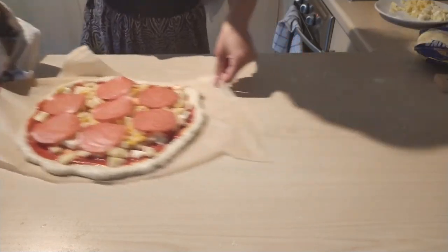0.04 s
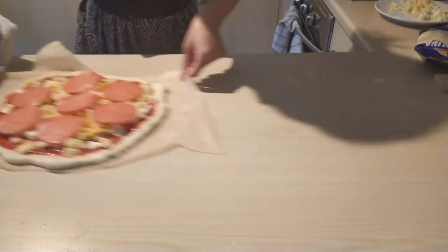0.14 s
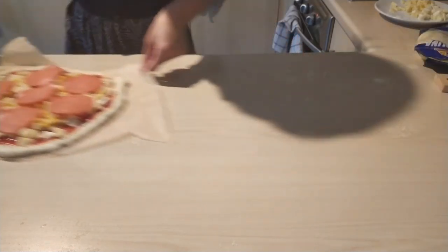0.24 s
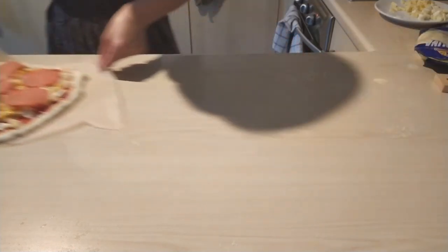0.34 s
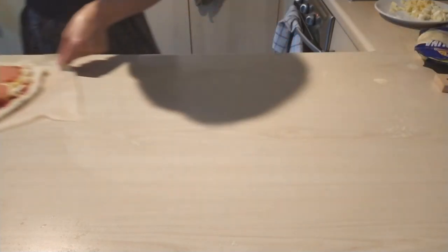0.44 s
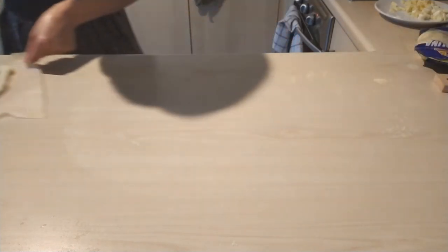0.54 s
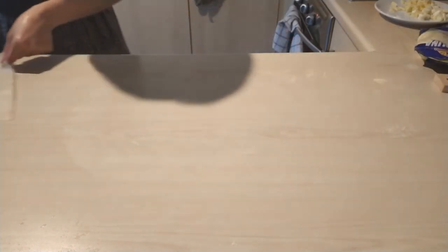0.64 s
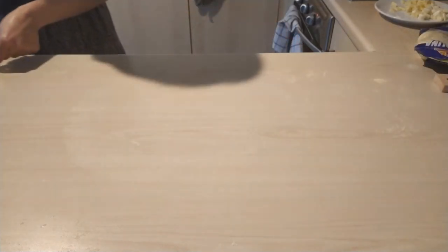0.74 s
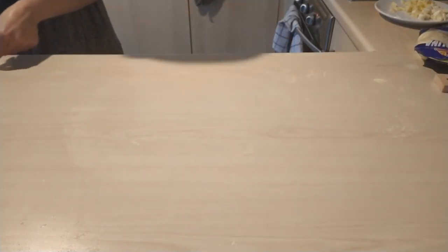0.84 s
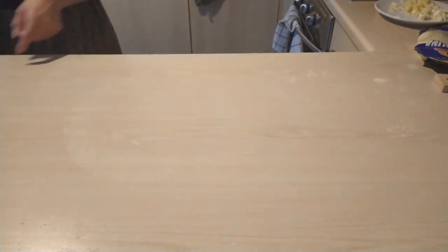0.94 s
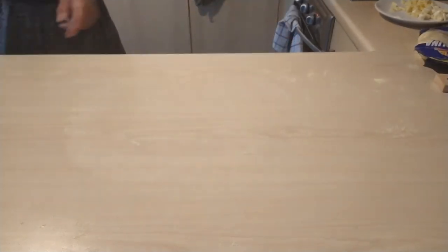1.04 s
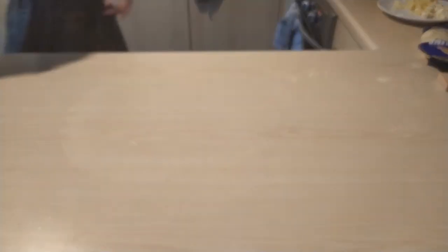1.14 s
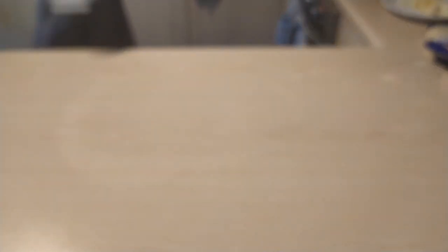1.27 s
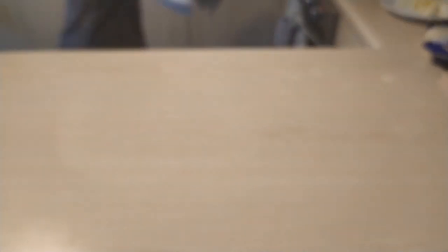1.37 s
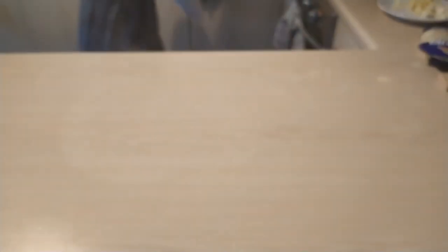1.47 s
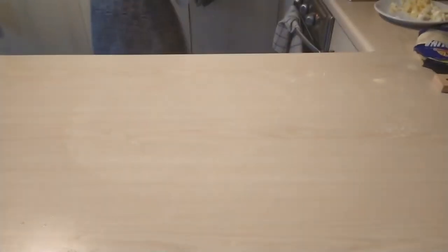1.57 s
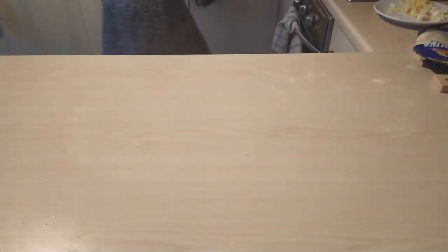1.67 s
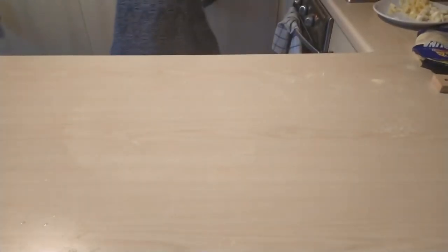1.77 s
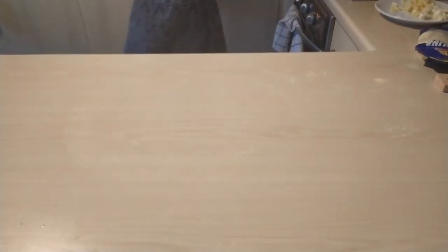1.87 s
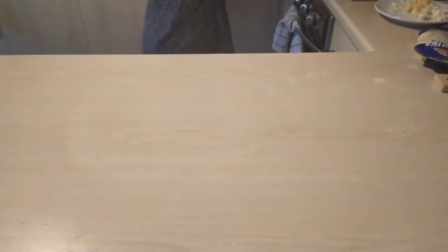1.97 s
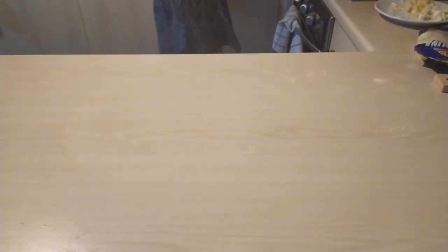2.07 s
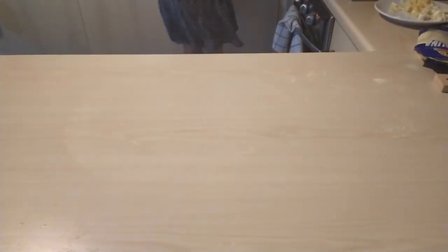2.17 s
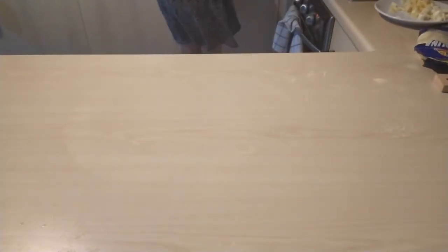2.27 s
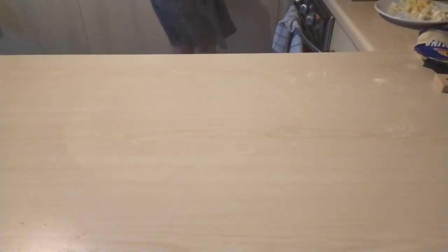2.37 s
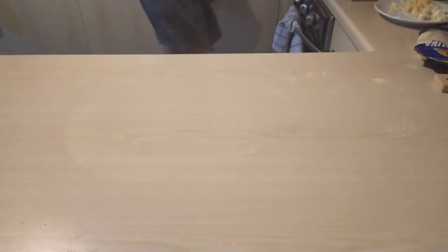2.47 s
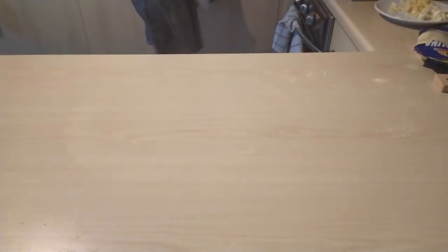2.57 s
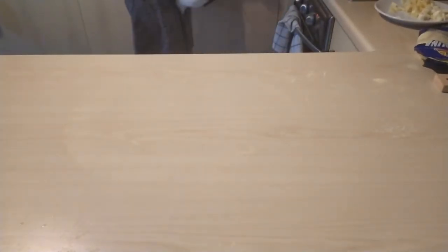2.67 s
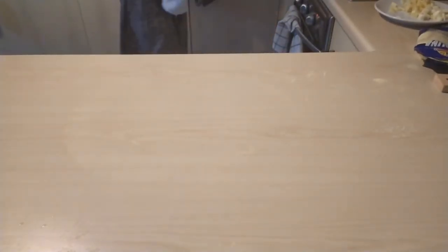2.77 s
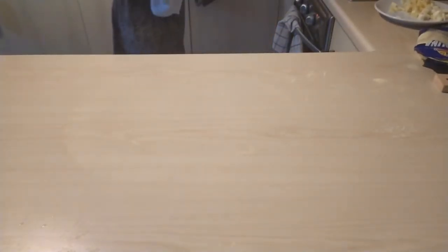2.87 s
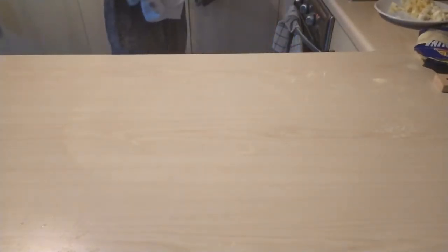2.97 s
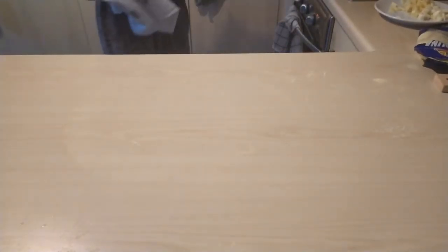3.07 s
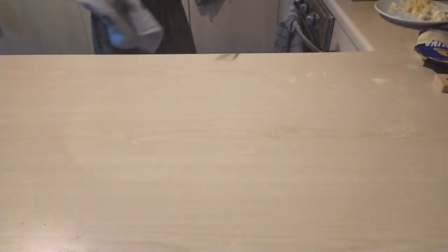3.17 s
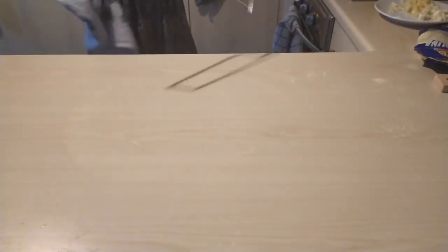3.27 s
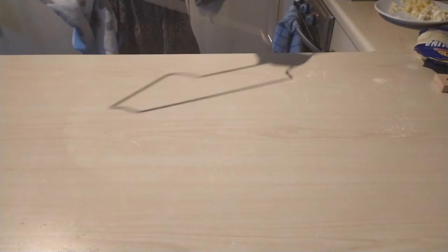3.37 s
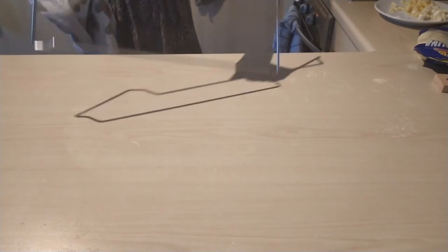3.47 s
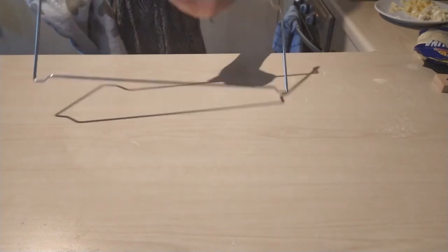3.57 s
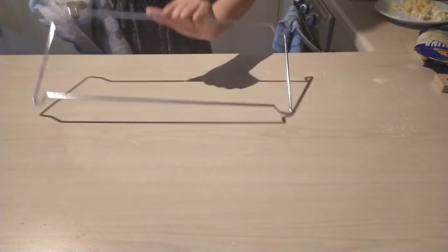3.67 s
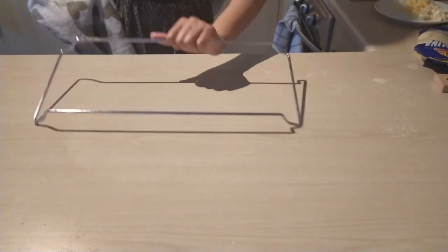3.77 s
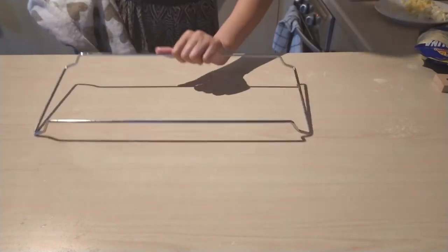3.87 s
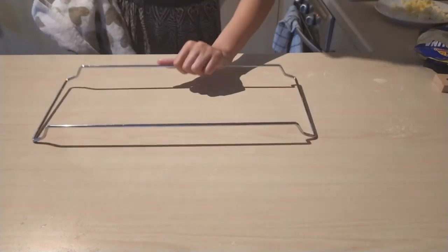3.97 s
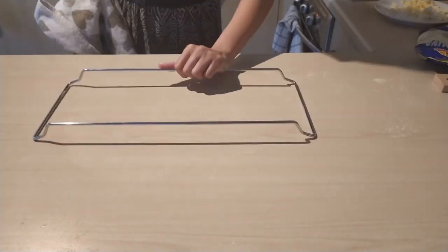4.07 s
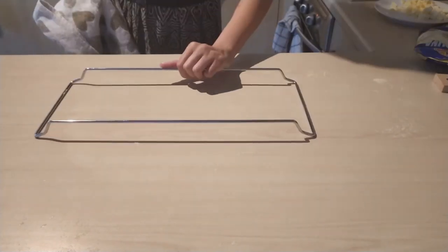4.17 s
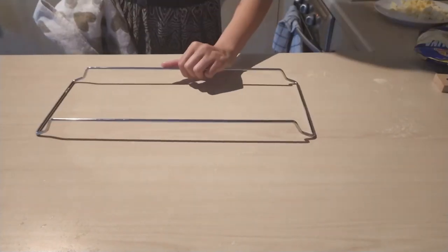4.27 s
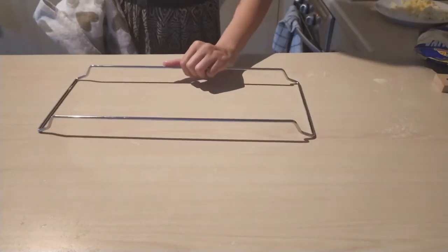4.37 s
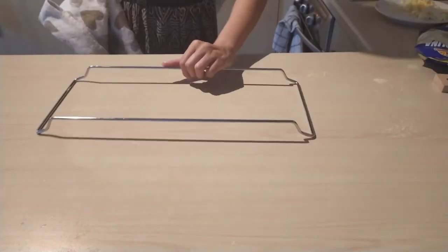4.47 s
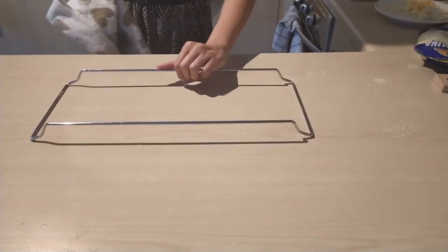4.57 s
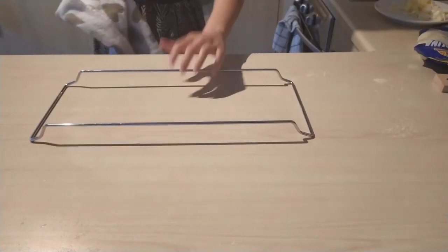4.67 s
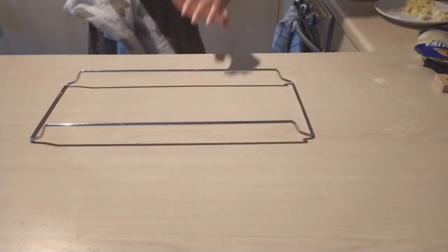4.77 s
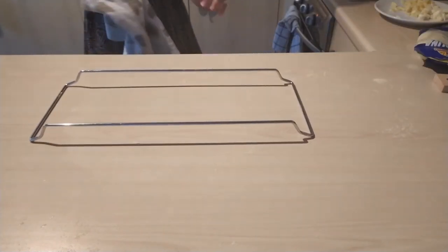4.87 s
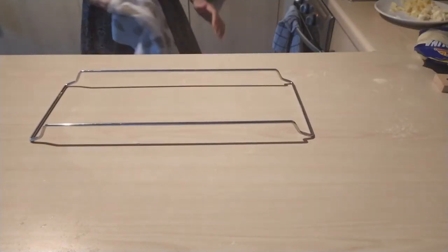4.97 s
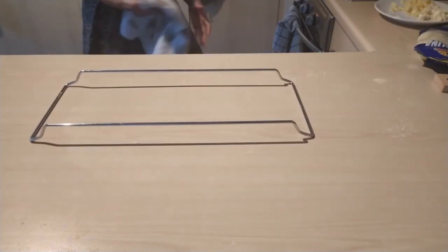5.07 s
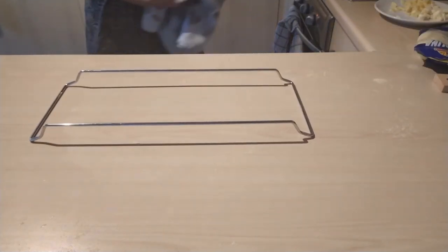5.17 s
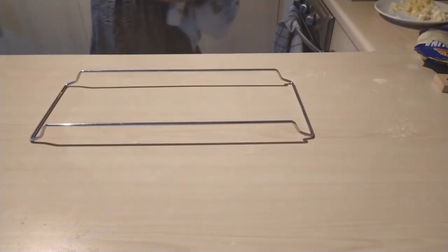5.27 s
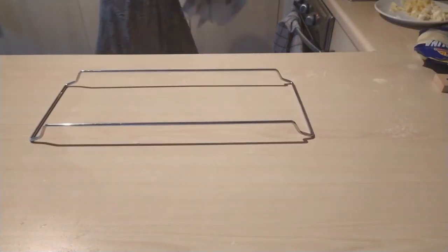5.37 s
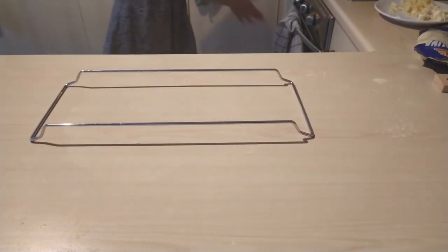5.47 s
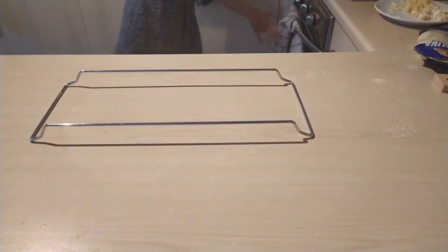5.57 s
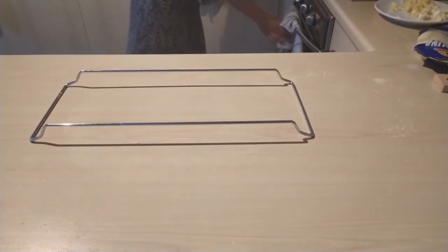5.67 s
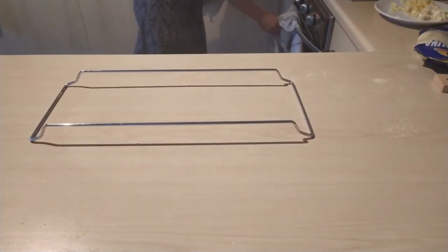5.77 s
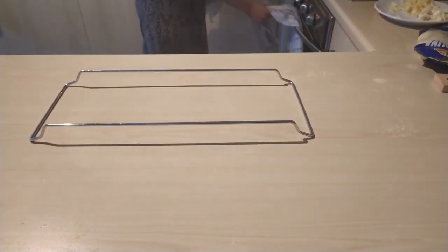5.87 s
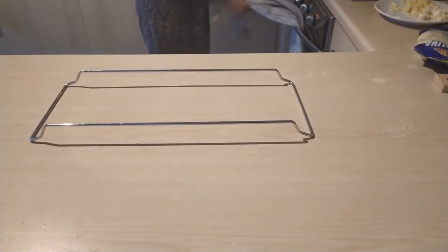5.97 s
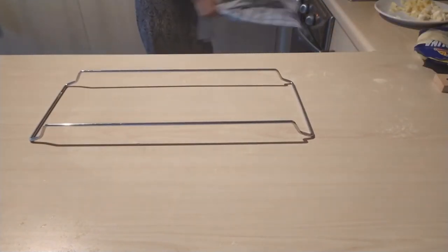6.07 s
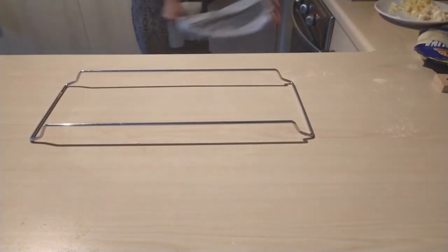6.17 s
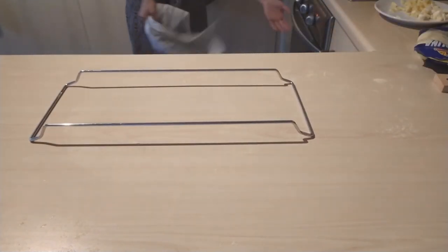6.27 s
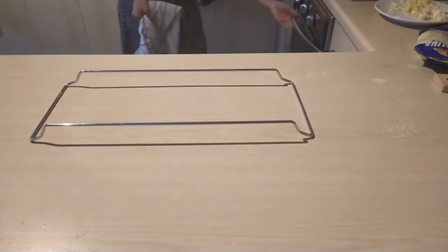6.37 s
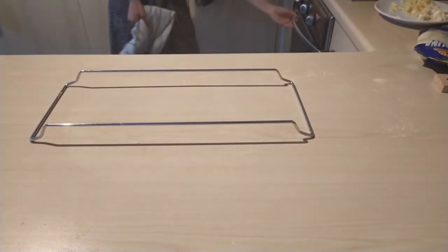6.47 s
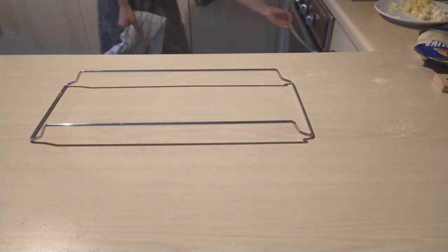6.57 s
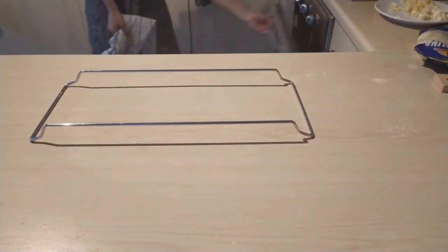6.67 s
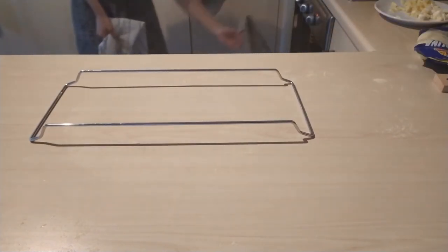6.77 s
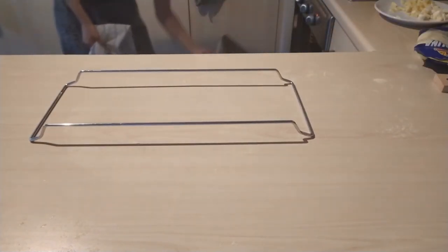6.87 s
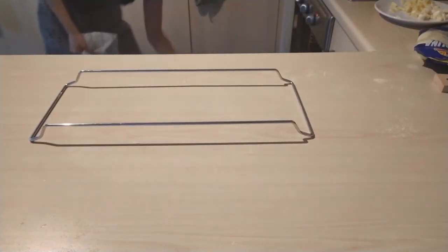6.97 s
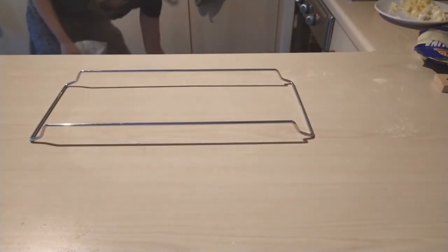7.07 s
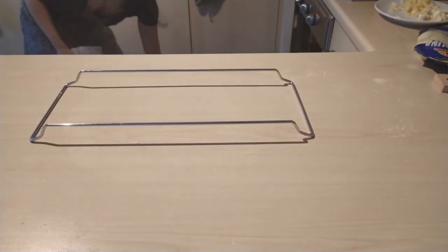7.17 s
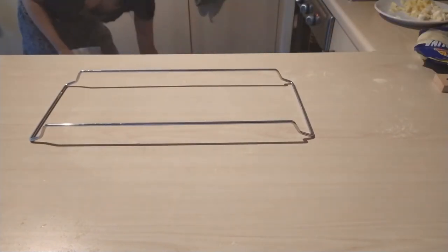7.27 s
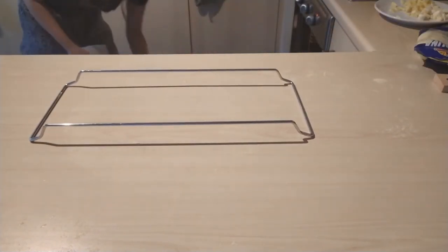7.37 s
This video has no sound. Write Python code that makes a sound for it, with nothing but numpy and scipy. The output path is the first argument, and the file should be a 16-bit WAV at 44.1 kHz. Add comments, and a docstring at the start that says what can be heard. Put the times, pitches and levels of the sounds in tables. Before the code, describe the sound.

Baking paper slides off a kitchen counter with a crackle, then a wire oven rack scrapes and clanks down, and an oven door opens.

```python
"""Baking paper hisses and crackles as it slides off a kitchen counter, close to two microphone ports.
A wire rack is dragged in dense little slips, clanks down so that wires and counter top ring together,
and is nudged into place. Cloth rustles, soles scuff, dull knocks come from farther off, and an oven door
opens on its fan. A short kitchen echo and a bed of air, hum and rumble lie behind it all."""
import sys
import numpy as np
from scipy import signal
from scipy.fft import rfft, irfft
from scipy.io import wavfile
from scipy.ndimage import uniform_filter1d

SR = 44100
rng = np.random.default_rng(int(sys.argv[2]) if len(sys.argv) > 2 else 0)


def to_wav(sig):
    """Store sig (one row per channel, or 1-D mono) as 16-bit WAV at the path in sys.argv[1].

    Samples outside -1..1 are clipped; the rate is SR.
    """
    pcm = np.clip(np.atleast_2d(sig), -1, 1) * 32767
    pcm = np.round(pcm).astype(np.int16)
    wavfile.write(sys.argv[1], SR, pcm.T)  # frames by channels


N = 327663

# rack meets counter: (time [s], level [dB], flatness [0 corner, 1 whole bar], treble [dB],
# ring length [factor], lasting ring [dB])
BLOWS = [(3.489, -8, 0.23, -5, 0.5, -9.5), (3.540, -12.5, 0.21, 4.5, 0.46, -6.5),
         (3.5453, -19, 0.16, 0, 0.38, -22), (3.564, -31.5, 0.34, 21, 0.26, -25),
         (3.571, -24, 0.11, 7.5, 0.68, -6.5), (3.634, -27.5, 0.5, 0, 0.51, -30),
         (3.713, -14, 0.81, 6, 0.91, -28), (3.7292, -19, 0.73, 3.5, 0.81, -18.5),
         (3.8013, -22.5, 0.89, 1, 0.57, -34), (3.807, -26, 0.85, 0.5, 0.95, -16),
         (3.84, -28.5, 0.74, -3, 0.6, -12), (4.0913, -28, 1, 13, 0.33, -30),
         (4.096, -28, 0.49, 6, 0.51, -26), (4.107, -32, 0.66, -3, .8, -16)]
# rack and counter top ringing together: (frequency [Hz], level [dB], t60 before damping [s])
RACK_MODES = [(200.5, -6, 0.18), (265, -3.5, 0.22), (296, -2, 0.16), (438, -6, 0.19), (451.5, 1.5, 0.26),
              (624, -14, 0.22), (797, 2.5, 0.088), (860, 0, 0.15), (1020, -3.5, 0.29), (1098, 0, 0.2),
              (1155, -1.5, 0.15), (1180, 0, 0.16), (1398, -6.5, 0.19), (1410, 2, 0.031), (1458, -3.5, 0.21),
              (1520, -11, 0.097), (1595, -7.5, 0.17), (1685, -9.5, 0.13), (1770, -11.5, .12),
              (1945, -1.5, 0.12), (2234, -0.5, 0.07), (2200, -3, 0.22), (2510, -4, 0.13), (2800, 0, 0.11),
              (3460, -8.5, 0.052), (3850, -10, 0.039), (4230, -16.5, 0.064), (5540, -29, 0.25)]
# how a landing stirs each band: (frequency [Hz], on a corner [dB], on a whole bar [dB])
LANDING_TONE = [(280, -2, -3), (550, -14.5, 3.5), (810, 5, -15), (1026, 5.5, -14.5), (1380, 4.5, 5.5),
                (1950, -14, 5.5), (2420, 3.5, -3), (2750, -3, -3), (3440, -5, 1.5), (4600, -5, 8.5),
                (5550, 1.5, 7.5)]
# first clash of wire on counter: (frequency [Hz], level [dB])
CRACK_TONE = [(88, -46.5), (150, -18.5), (634, -5.5), (1230, 4), (2580, -4), (4450, -19.5), (5100, -26.5),
              (8310, -20.5), (10700, -24), (12500, -47), (15800, -52.5)]
# the drag and the nudge, a curve each: (time [s], level [dB], contact resonance [Hz])
DRAGS = [
    [(2.075, -52, 1280), (2.095, -56.5, 1300), (2.17, -49.5, 1330), (2.215, -52, 1380), (2.245, -44, 1200),
     (2.33, -41.5, 1160), (2.398, -45.5, 1090), (2.48, -44, 1010), (2.51, -50, 1050), (2.57, -80, 1104)],
    [(4.24, -74, 1600), (4.34, -57, 1710), (4.38, -66, 1600), (4.494, -62.5, 1010), (4.544, -51, 1520),
     (4.598, -55, 1380), (4.72, -72.5, 1100)],
]
# wire on a rough surface: (frequency [Hz], level [dB])
SCRAPE_TONE = [(200, -37), (437, 3.5), (570, -6), (900, -4), (1300, 0), (1950, -6.5), (2350, -5),
               (4300, -19.5), (7000, -40.5)]
# the paper's slide: (time [s], level [dB])
PAPER_SLIDE = [(0, -39), (.15, -42.5), (.25, -38), (.32, -41.5), (.46, -43), (.6, -50), (.76, -49),
               (.92, -48.5), (.97, -64), (1.1, -99)]
# paper rubbing on the counter: (frequency [Hz], level [dB])
PAPER_TONE = [(350, -54), (700, -13), (1400, -8), (3910, -6), (5360, -9), (9520, 5.5), (11000, 0.5),
              (11900, -11.5), (15800, -17)]
# paper hiss across the ports: (frequency [Hz], left-right likeness [0 to 1])
PAPER_LIKENESS = [(600, .6), (1500, .1), (4000, .1), (15000, 0)]
# side the paper hiss favours: (frequency [Hz], left over right [dB])
PAPER_BALANCE = [(60, 4.5), (240, 4.0), (950, 3.5), (3770, -2), (15000, -3)]
# the paper snaps as it creases: (time [s], level [dB], t60 [s])
SNAPS = [(.108, -34, 0.017), (0.224, -44, .02), (0.2446, -29, 0.0092), (0.254, -23, 0.011),
         (0.325, -33, 0.025), (0.3787, -38, 0.017), (0.38, -26.5, .008), (.4015, -30.5, .007),
         (0.448, -34, 0.017), (0.696, -40, .006), (.7165, -40, .006), (.727, -37, 0.0065),
         (0.732, -44, .04), (0.7397, -35, 0.0065), (0.7662, -39, 0.0096), (0.7703, -31, .025),
         (.787, -30, 0.0072), (0.8213, -30.5, 0.0094), (0.825, -38, 0.097)]
# soles scuff: (time [s], level [dB], t60 [s])
SCUFFS = [(1.771, -57.5, 0.37), (1.993, -49, 0.19), (2.893, -59.5, 1), (5.389, -54.5, 0.24),
          (5.648, -63.5, 1), (6.71, -43.5, 0.38)]
# cloth swishes: (time [s], level [dB], t60 [s])
SWISHES = [(0.61, -49, 0.18), (.69, -52, 0.71), (1.172, -63.5, 0.39), (1.301, -59, 0.3),
           (1.879, -61.5, 0.56), (3.111, -50, 0.26), (4.85, -60.5, 0.43), (5.978, -63, 0.55),
           (7.08, -51, 1.67), (7.17, -55, 0.51), (7.271, -49.5, 0.21)]
# friction hiss of cloth, soles and rack: (frequency [Hz], level [dB])
HISS_TONE = [(880, -36.5), (1500, -19), (1700, -13), (2120, 2), (5510, -1.5), (9370, 3), (10500, 2),
             (14500, -26), (15800, -27)]
# hands, feet and doors: (time [s], level [dB], rise [s], t60 [s])
KNOCKS = [(1.916, -48.5, 0.00087, 0.063), (1.932, -45, 0.0022, 0.18), (5.966, -51, 0.00092, 0.43),
          (6.742, -31.5, 0.01, 0.18), (6.785, -41, 0.0047, 0.24)]
# a dull knock: (frequency [Hz], level [dB])
KNOCK_TONE = [(59, -28), (110, -11), (175, 4), (300, -6), (497, -1.5), (657, -9), (800, 1), (957, -3),
              (1060, -5.5), (5000, -30.5), (11000, -68)]
# the fan comes through as the oven door opens: (time [s], level [dB])
FAN_LEVEL = [(6.45, -65), (6.57, -52.5), (6.858, -46), (7.216, -48), (7.43, -47)]
# rush of the fan: (frequency [Hz], level [dB])
FAN_TONE = [(59, -47), (100, -32.5), (219, -9), (254, -1.5), (325, -21.5), (489, -5), (854, -4.5),
            (1070, -7), (2280, -15.5), (5000, -31), (11000, -40.5)]
# the kitchen's steady air: (frequency [Hz], level [dB])
AIR_TONE = [(41, -27), (70, -33.5), (92, -4), (166, -9), (244, -3.5), (392, -13), (492, -8), (539, -16),
            (676, -8.5), (850, -12.5), (1100, -18.5), (2100, -19.5), (5700, -37.5), (9590, -28),
            (15800, -68)]
# partials of the hum: (frequency [Hz], level [dB])
HUM = [(100.3, -66.5), (197, -71.5), (296, -69)]
# one overtone of the hum comes and goes: (time [s], level [dB])
OVERTONE_LEVEL = [(0, -74), (1.05, -87), (1.25, -69), (1.7, -65), (2.1, -77), (3.95, -65), (4.3, -64.5),
                  (4.85, -70), (5.4, -83.5), (7.43, -74.5)]
# the house rumble swells or sags: (middle [s], half length [s], rumble [dB], drone [dB])
SWELLS = [(2.343, 0.61, 9.5, 5), (3.027, 0.26, 9.5, 18.5), (4.007, 0.73, 7, 0), (5.303, 0.23, 5.5, -1),
          (5.956, 0.59, -3.5, -8.5)]
# decay of the kitchen's echo: (frequency [Hz], t60 [s])
ECHO_T60 = [(200, 0.44), (1000, 0.42), (4000, 0.23), (10000, 0.32)]
# the room across the ports: (frequency [Hz], left-right likeness [1 = identical])
PORT_LIKENESS = [(60, 0.9), (180, 0.87), (550, 0.37), (1650, 0.022), (4970, 0.079), (15000, -0.12)]
# level between the ports: (frequency [Hz], left over right [dB])
PORT_BALANCE = [(60, 6), (180, 4), (550, 4), (1650, 1), (4970, -4), (15000, -2.5)]
# phase between the ports: (frequency [Hz], left lead [rad])
PORT_LEAD = [(300, 0), (800, -.8), (1600, -3), (2400, 0)]

BAR_HZ, OVERTONE_HZ, DRONE_HZ = 1680, 495, 53
AIR_DB, RUMBLE_DB, DRONE_DB = -56, -57.5, -68
DROPOUT_S, BAND_LIMIT_HZ = (2.076, 2.077), 15850


def rack_blows():
    """Close up, each blow is a crack, a short knock of all modes, loose wires chattering and a ring."""
    out, t = np.zeros((2, N)), np.arange(SR // 4) / SR
    for s, db, flatness, treble_db, length, ring_db in BLOWS:
        shelf = [(1600, 0), (3200, treble_db)]
        shade = tilted([(hz, corner + flatness * (bar - corner)) for hz, corner, bar in LANDING_TONE],
                       shelf)
        crack = gain_of(-4.5) * burst(tilted(CRACK_TONE, shade), t60=0.039, rise=0.00045)
        knock = crack + rack_ring(shade, damping=3.54 / length)
        rattle = ticks(len(t), per_s=310, spread=1.5) * gain_of(-22 - 60 * t / 0.5)
        chatter = signal.fftconvolve(knock, rattle[None], axes=1)[:, :knock.shape[1]]
        ring = gain_of(ring_db) * rack_ring(shade, damping=1.46 / length)
        add(out, s, gain_of(db) * (knock + chatter + ring))
    return out


def rack_ring(shade, damping):
    """The modes struck once, neighbours starting opposite ways; high ones differ between the ports."""
    hz, db, t60 = np.transpose(RACK_MODES)[:, :, None]
    t = np.arange(SR // 2) / SR
    scatter, apart, grip = rng.uniform(-0.86, 1, (3, *hz.shape))
    hz = hz * (1 + 0.0073 * grip)  # the hand's grip detunes the wires a little
    phase = 2 * np.pi * hz * t + np.pi * np.arange(len(hz))[:, None] + 0.9 * scatter
    port_phase = 2.6 * apart * np.clip(hz / 1100, 0, 1) ** 2
    decay = gain_of(db + read(shade, hz) - 60 * t * damping / t60)
    swell = np.minimum(t * hz / 2.24, 1)  # a mode needs about two cycles to build up
    ports = [gain_of(side * read(PORT_BALANCE, hz) / 2) * np.sin(phase + side * port_phase / 2)
             for side in (1, -1)]
    return (decay * swell * np.array(ports)).sum(1) / 2


def rack_drags():
    """Dense slips of wire on a rough surface; wires near the contact and a cross bar ring along."""
    shared, *own = [ticks(N, per_s=5700, spread=0.6) for _ in range(3)]
    scrape = coloured(shared + 2.1 * np.array(own), SCRAPE_TONE)
    s, _, hz = np.vstack(DRAGS).T
    contact = unit_rms(resonate(scrape, np.interp(np.arange(N) / SR, s, hz), width_hz=120))
    bar = unit_rms(resonate(scrape, np.full(N, BAR_HZ), width_hz=90))
    hiss = port_noise(HISS_TONE, patchy_db=1, size=256)
    layers = gain_of(-1.5) * scrape + gain_of(-7) * contact + gain_of(-14.5) * bar + gain_of(-11) * hiss
    return layers * sum(level(curve) for curve in DRAGS)


def baking_paper():
    """Close and dry: a sliding hiss with small random crinkles, and the thin snaps of the creases."""
    clicks = ticks(N, per_s=750, spread=3.5)
    crinkle = burst(tilted(PAPER_TONE, [(3000, 2.2), (9000, -2.2)]), t60=0.0035, rise=0.0001)
    crinkles = signal.oaconvolve(clicks[None], crinkle[:, :900], axes=1)[:, :N]
    hiss = port_noise(PAPER_TONE, patchy_db=2, size=256, likeness=PAPER_LIKENESS, balance=PAPER_BALANCE)
    out = level(PAPER_SLIDE) * (hiss + gain_of(-12.5) * unit_rms(crinkles))
    thin = tilted(PAPER_TONE, [(2000, -7), (7000, -5), (13000, 2.5)])
    to_right = gain_of([[-2.1], [2.1]])
    for s, db, t60 in SNAPS:
        add(out, s, gain_of(db) * burst(thin, t60, rise=0.00071) * to_right)
    return out


def soles_and_cloth():
    """Puffs of friction hiss: soles start at once, cloth swells first."""
    out = np.zeros((2, N))
    for s, db, t60 in SCUFFS:
        add(out, s, gain_of(db) * burst(HISS_TONE, t60, rise=0.0046))
    for s, db, t60 in SWISHES:
        add(out, s, gain_of(db) * burst(HISS_TONE, t60, rise=0.1 * t60))
    return out


def distant_knocks():
    """Hands, feet and doors away from the microphone, each a dull mono burst."""
    out = np.zeros(N)
    for s, db, rise, t60 in KNOCKS:
        add(out, s, gain_of(db) * burst(KNOCK_TONE, t60, rise)[0])
    return out


def oven_fan():
    """A low rush of air that comes up as the oven door opens."""
    return level(FAN_LEVEL) * port_noise(FAN_TONE, patchy_db=0.5)


def room_tone():
    """Steady air, a wavering hum to the left, and the deep rumble and drone of the house."""
    t = np.arange(N) / SR
    wavers_db = unit_rms(uniform_filter1d(rng.standard_normal((len(HUM), N)), size=5000, axis=1))
    hum = sum(np.sqrt(2) * gain_of(db + waver) * np.sin(2 * np.pi * (hz * t + rng.random()))
              for (hz, db), waver in zip(HUM, wavers_db))
    drift = unit_rms(uniform_filter1d(rng.standard_normal(N), size=6000))
    hum += level(OVERTONE_LEVEL) * gain_of(3.3 * drift) * sine(OVERTONE_HZ + 4 * drift[::-1])
    rumble = port_noise([(4, -2.5), (10, 6), (35, -6), (45, -15), (150, -61.5)], patchy_db=2.5, size=8192)
    drone = gain_of(2.5 * drift[::-1] + [[2.2], [-2.2]]) * sine(DRONE_HZ + 2.47 * drift)
    air = gain_of(AIR_DB) * port_noise(AIR_TONE, patchy_db=2.5)
    swell_db = sum(np.outer(db, np.maximum(1 - abs(t - s) / half, 0)) for s, half, *db in SWELLS)
    house = gain_of(RUMBLE_DB + swell_db[0]) * rumble + gain_of(DRONE_DB + swell_db[1]) * drone
    return air + house + hum * gain_of([[2.1], [-2.1]])


def kitchen_echo(x):
    """Sparse reflections of random sign, each band dying at its own speed; the ports share the bass."""
    taps = np.zeros((2, SR))
    at = np.arange(130, SR - 20, 20) + rng.integers(0, 20, (2, (SR - 131) // 20))
    np.put_along_axis(taps, at, rng.choice([-1., 1.], at.shape), 1)
    hz, t, (left, other) = signal.stft(taps, SR, nperseg=256)
    alike = np.clip(read(PORT_LIKENESS, hz), 0, 1)[:, None]
    side = gain_of(read(PORT_BALANCE, hz) / 2)[:, None]
    right = alike * left + np.sqrt(1 - alike ** 2) * other
    decay = gain_of(-60 * t / read(ECHO_T60, hz)[:, None])
    tail = signal.istft(np.array([left * side, right / side]) * decay, SR, nperseg=256)[1]
    return signal.fftconvolve(x[None], tail / np.linalg.norm(tail) * np.sqrt(2), axes=1)[:, :N]


def port_noise(tone, patchy_db, size=1024, likeness=PORT_LIKENESS, balance=PORT_BALANCE):
    """Noise at the two ports, from random short-time spectra with drifting patches."""
    frames, hz = 4 * N // size + 5, np.fft.rfftfreq(size, 1 / SR)
    a, b, c, d, patches = rng.standard_normal((frames, len(hz), 5)).T
    left, other = a + 1j * b, c + 1j * d
    patches = unit_rms(uniform_filter1d(uniform_filter1d(patches, size=9, axis=0), size=9, axis=1))
    alike = np.clip(read(likeness, hz), 0, 1)[:, None]
    right = alike * left * np.exp(-1j * read(PORT_LEAD, hz))[:, None] + np.sqrt(1 - alike ** 2) * other
    side = gain_of(read(balance, hz) / 2)[:, None]
    colour = gain_of(read(tone, hz)[:, None] + patchy_db * patches)
    spectra = np.array([left * side, right / side]) * colour
    return unit_rms(signal.istft(spectra, nperseg=size, noverlap=3 * size // 4)[1][:, :N])


def burst(tone, t60, rise):
    """A puff of coloured noise at both ports that swells for rise seconds and dies away."""
    t = np.arange(SR // 2) / SR
    shared, *own = rng.standard_normal((3, len(t)))
    shape = np.minimum(t / rise, 1) * gain_of(-60 * np.maximum(t - rise, 0) / t60)
    return coloured(0.32 * shared + np.array(own), tone) * shape


def ticks(count, per_s, spread):
    """Random clicks of either sign over count samples; more spread makes a few stand out."""
    when, size, sign = rng.random((count, 3)).T
    return (when < per_s / SR) * gain_of(-spread * np.log(size + 0.00077)) * np.sign(sign - 0.5)


def resonate(x, hz, width_hz):
    """A moving resonance: shifts the curve hz down to zero, smooths, and shifts back."""
    turn = np.exp(2j * np.pi * np.cumsum(hz) / SR)
    pole = np.exp(-np.pi * width_hz / SR)
    return 2 * (turn * signal.lfilter([1 - pole], [1, -pole], x / turn)).real


def sine(hz):
    """A sine of rms 1 that follows a pitch curve."""
    return np.sqrt(2) * np.sin(2 * np.pi * np.cumsum(hz) / SR)


def coloured(x, tone):
    """Filters noise by a spectrum, rms 1."""
    hz = np.fft.rfftfreq(x.shape[-1], 1 / SR)
    return unit_rms(irfft(rfft(x) * gain_of(read(tone, hz)), x.shape[-1]))


def tilted(tone, tilt):
    """Adds a second dB curve to a spectrum."""
    return [(hz, db + read(tilt, hz)) for hz, db in tone]


def read(points, hz):
    """Reads a spectrum, straight lines on a log-frequency axis."""
    f, value = np.transpose(points)
    return np.interp(np.log(hz + 1), np.log(f + 1), value)


def level(curve):
    """Gain over time from a dB curve, silent outside it."""
    s, db = np.transpose(curve)[:2]
    return gain_of(np.interp(np.arange(N) / SR, s, db, -120, -120))


def add(mix, s, sound):
    """Adds a sound into the mix from second s."""
    part = mix[..., round(s * SR):][..., :sound.shape[-1]]
    part += sound[..., :part.shape[-1]]


def gain_of(db):
    """Decibels to gain."""
    return 10 ** (np.asarray(db) / 20)


def unit_rms(x):
    """Scales to rms 1."""
    return x / np.sqrt(np.mean(x ** 2) + 1e-20)


def scene():
    """All sources at the ports, with the kitchen's echo on rack, knocks, soles and cloth."""
    rack, knocks, rustle = rack_blows() + rack_drags(), distant_knocks(), soles_and_cloth()
    direct = rack + knocks * gain_of([[-1.5], [-4.5]]) + baking_paper() + rustle
    send = gain_of(-3.5) * rack[0] + gain_of(-2.5) * knocks + gain_of(-0.5) * rustle[1]
    return direct + kitchen_echo(send) + room_tone() + oven_fan()


def record(dry):
    """The level dips for a few milliseconds as the drag starts; the highest treble is cut off."""
    t = np.arange(N) / SR
    start, end = DROPOUT_S
    gate = np.clip(np.maximum((start - t) / 0.0034, (t - end) / 0.0051), 0.07, 1)
    lowpass = signal.firwin(1023, BAND_LIMIT_HZ, window=("kaiser", 9), fs=SR)
    return signal.oaconvolve(dry * gate, lowpass[None], "same")


dry = scene()
out = record(dry)
to_wav(out)
```